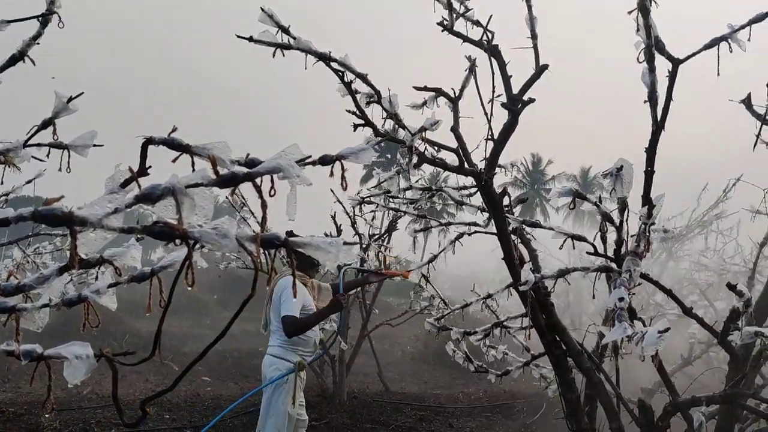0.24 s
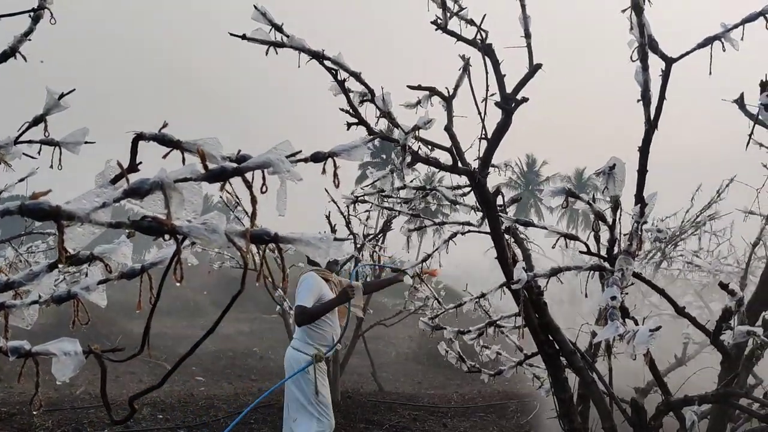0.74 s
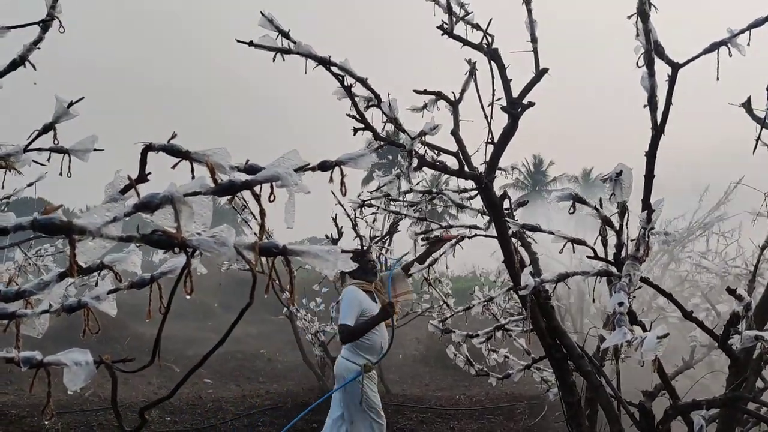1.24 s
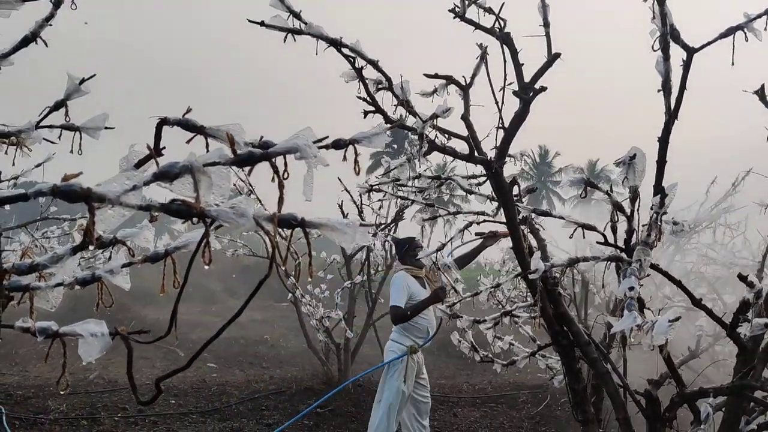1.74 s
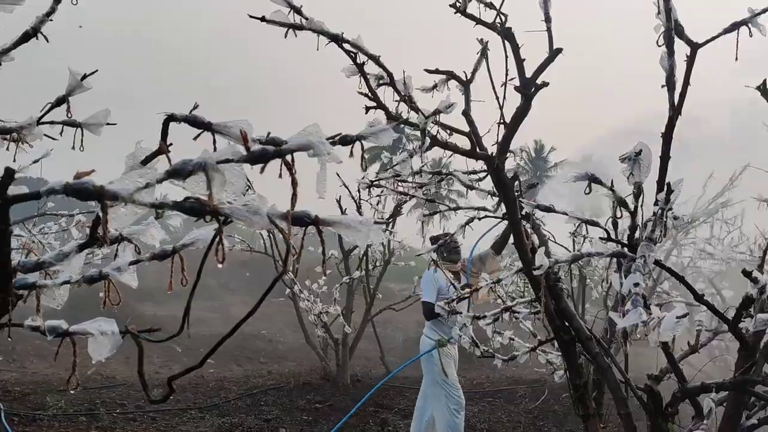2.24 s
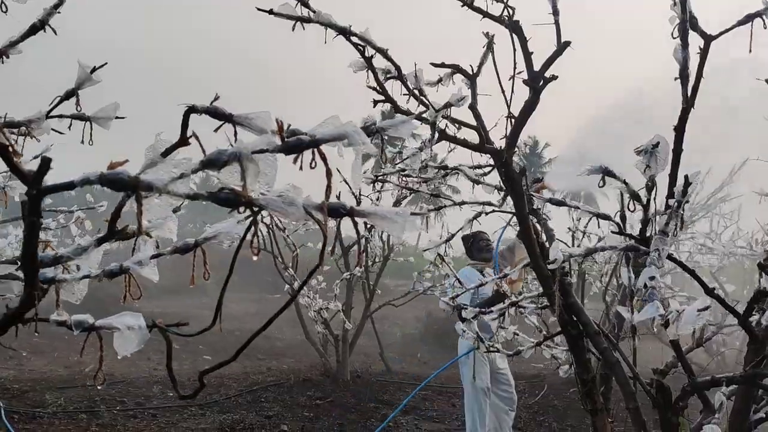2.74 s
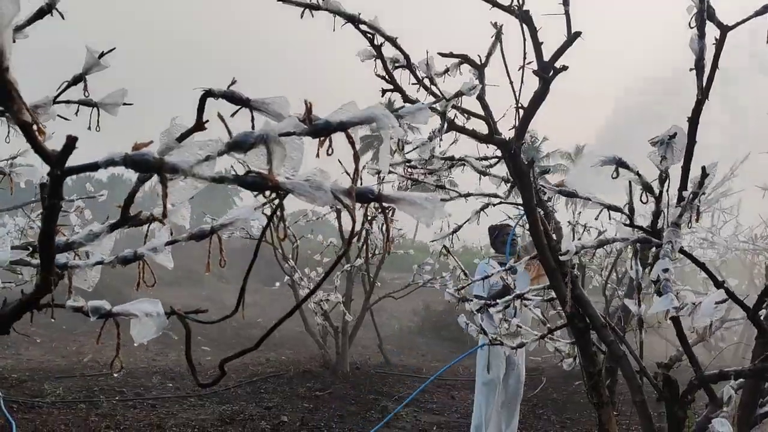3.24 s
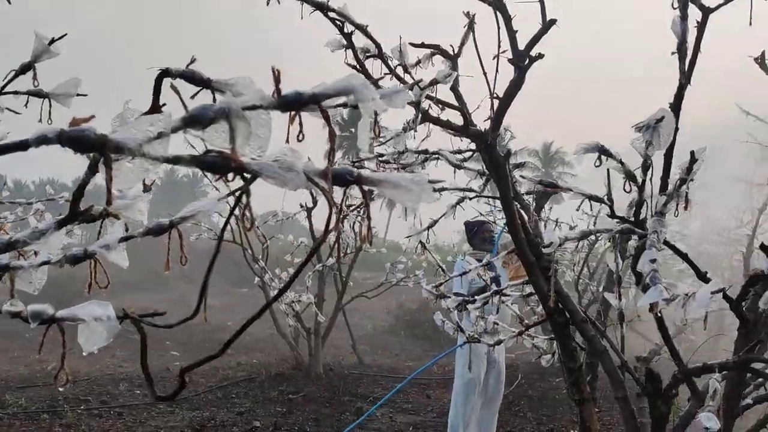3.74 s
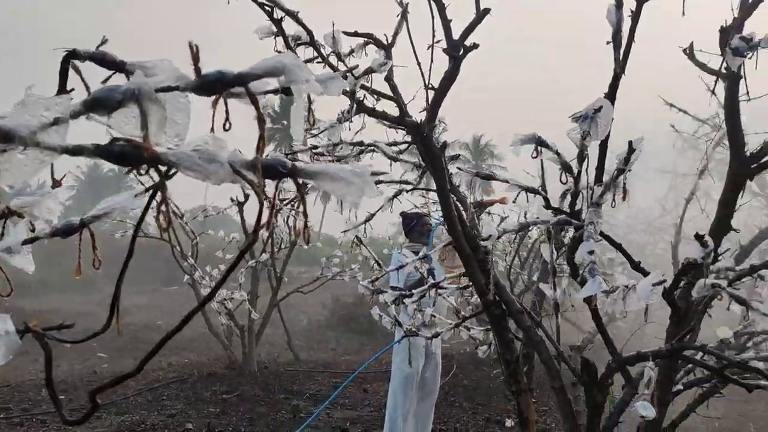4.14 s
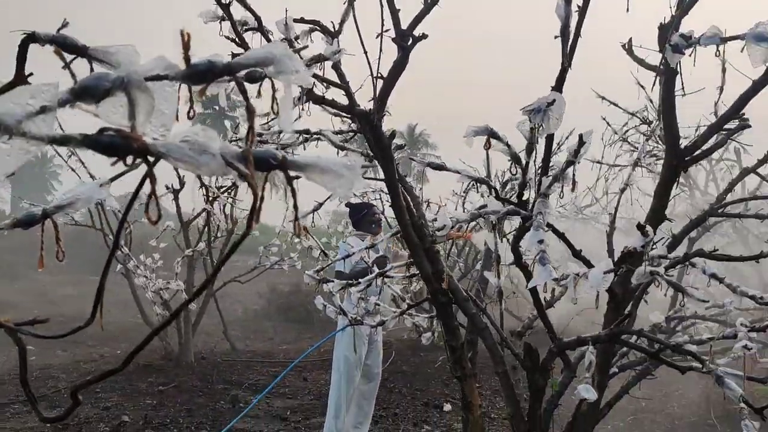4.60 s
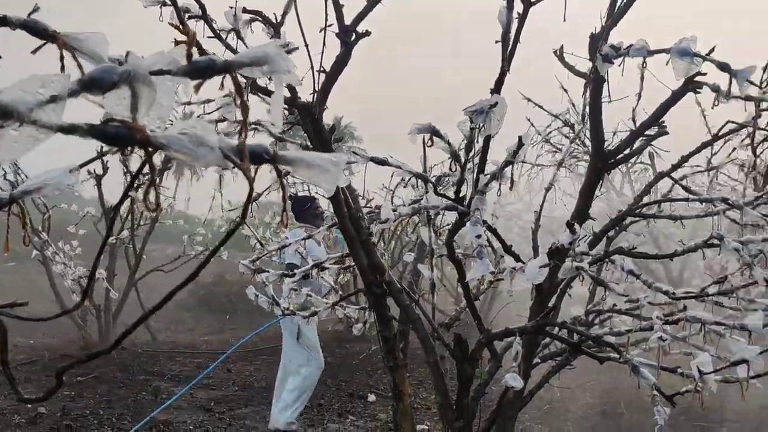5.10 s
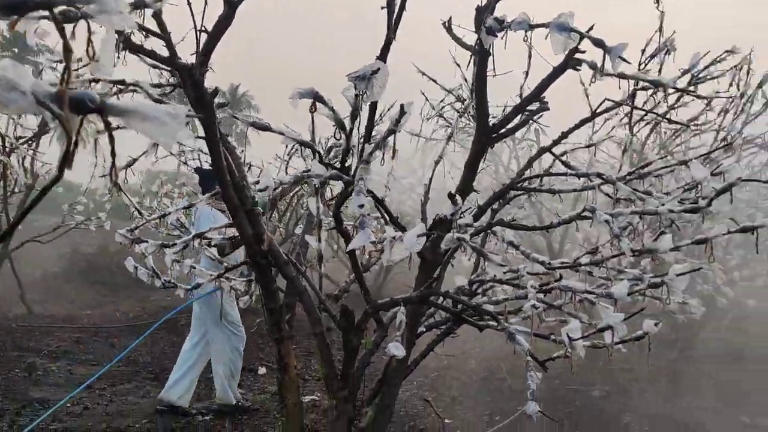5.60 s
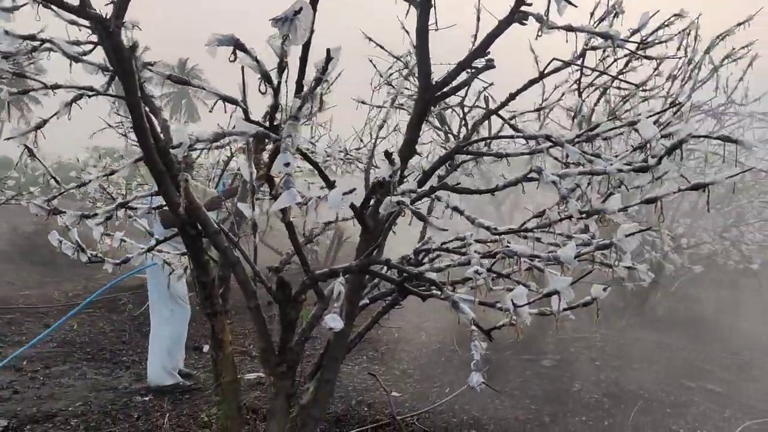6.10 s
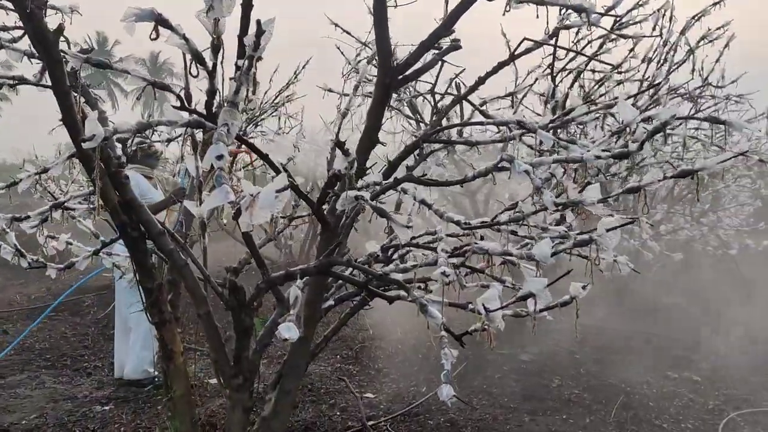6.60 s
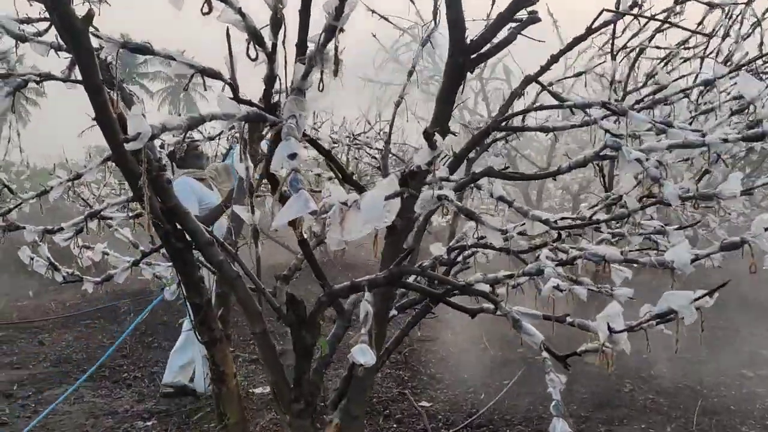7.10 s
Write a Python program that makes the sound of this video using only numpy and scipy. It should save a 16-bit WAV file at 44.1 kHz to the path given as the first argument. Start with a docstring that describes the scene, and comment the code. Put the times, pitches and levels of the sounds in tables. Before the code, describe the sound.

A hand-held spray gun hisses without a break among bare orchard trees, a few metres from the microphone. As it is swung about, the rush of water shifts in colour with a soft phasing swish, and brief half-whistling tones swell and fade inside it. Further off, a single-cylinder diesel engine thuds evenly, with a faint pump hum and low open-air rumble underneath.

```python
"""Orchard spray gun and diesel pump

A hand-held spray gun hisses over bare trees, swung about a few metres from a moving phone.
The turbulent jet reaches two microphone ports directly and off the holder's body, the ground and
the branches; the paths change, so its colour sweeps. Half-whistling bands surge with the swing.
Further off a single-cylinder diesel thuds steadily and drives a humming pump, over open-air rumble."""
import sys
import numpy as np
from scipy import signal
from scipy.fft import rfft, irfft, next_fast_len
from scipy.io import wavfile
from scipy.ndimage import uniform_filter1d, map_coordinates

SR = 44100
rng = np.random.default_rng(int(sys.argv[2]) if len(sys.argv) > 2 else 0)


def inscribe(sig):
    """Save sig as 16-bit PCM at rate SR to the path in sys.argv[1].

    A 1-D sig is mono; a 2-D sig holds one channel per row.
    Samples are clipped to [-1, 1] before scaling.
    """
    pcm = np.round(np.clip(np.atleast_2d(sig).T, -1, 1) * 32767)
    wavfile.write(sys.argv[1], SR, pcm.astype(np.int16))


N = 324135
TIME = np.arange(N) / SR

# jet spectra, dragged air up to finest mist: freq_hz, relative_density_db
ROAR_SPECTRUM = [(120.0, -57.0), (220.0, -27), (330.0, -3.5), (480.0, 0.2), (700.0, -5), (1000.0, -6),
                 (1350.0, -2.8), (1650.0, -2.5), (2100.0, -9), (3200.0, -19.1)]
RUSH_SPECTRUM = [(800.0, -31), (1200.0, -15.5), (1600.0, -9), (2000.0, -2.2), (2500.0, 1.8), (3000.0, 2.2),
                 (3500.0, -5), (4000.0, -4), (5000.0, -7.5), (7000.0, -28)]
HISS_SPECTRUM = [(2200.0, -7), (3200.0, 7), (4200.0, 4.5), (4700.0, 3.5), (5200.0, 10), (6100.0, 7.5),
                 (7000.0, -1.5), (8300.0, -19), (10000.0, -13.5), (12000.0, -31)]
MIST_SPECTRUM = [(5500.0, -2), (7000.0, 2.5), (8500.0, 5), (9500.0, -0.29), (11000.0, -0.3), (13000.0, 0.3),
                 (16000.0, -3.8)]
# roar of dragged air: time_s, level_db
ROAR_LEVELS = [(0.0, -45.4), (1.3, -44.5), (2.0, -46), (3.35, -47), (3.9, -45), (5.0, -46.5), (6.0, -45.5),
               (7.35, -45.5)]
# rush of the water fan: time_s, level_db
RUSH_LEVELS = [(0.0, -40.5), (0.45, -40.7), (1.08, -44.5), (1.52, -40.5), (2.1, -42), (2.7, -42.7),
               (3.57, -45.5), (4.0, -46), (4.57, -42), (5.06, -44.5), (5.73, -44), (6.1, -45.5),
               (6.45, -44), (7.35, -40.5)]
# how squarely the jet faces the phone, as beamed treble: time_s, treble_db
JET_FACING = [(0.0, -49.5), (0.6, -49.5), (0.97, -47), (1.31, -48), (1.55, -51), (2.02, -49.0),
              (2.45, -49.3), (2.9, -48), (3.4, -45.5), (3.84, -47.5), (4.32, -48), (4.79, -51), (5.12, -54),
              (5.71, -52.5), (6.4, -52), (6.77, -51), (6.9, -49), (7.35, -49.5)]
# paths set by the holder's stance: time_s, right_port_lag_ms, left_body_echo_ms, right_body_echo_ms
STANCE_DELAYS = [(0.0, 0.2, 1.1, 0.84), (0.5, 0.2, 1.11, 0.86), (1.2, 0.19, 1.13, 0.83),
                 (1.8, 0.13, 1.08, 0.84), (2.6, 0.13, 1.14, 0.85), (3.7, 0.13, 1.16, 0.87),
                 (4.3, 0.18, 1.31, 0.87), (5.1, 0.2, 1.24, 0.87), (5.65, 0.31, 1.39, 1.0),
                 (6.05, 0.29, 1.13, 0.81), (6.4, 0.29, 1.25, 0.87), (6.8, 0.29, 1.5, 1.15),
                 (7.35, 0.26, 1.59, 1.15)]
# ground echo as the gun is raised and dipped: time_s, delay_ms
GROUND_DELAYS = [(0, 2.1), (.52, 1.86), (1.26, 2.18), (1.91, 2.07), (2.62, 2.5), (3.44, 2.22), (4.1, 2.27),
                 (5.09, 2.02), (6.08, 1.87), (7.35, 2.34)]
# microphone port resonances: centre_hz, width_hz, gain_db
LEFT_RESONANCES = [(756, 250, 7), (2520, 610, 7.5), (4130, 700, 2), (6550, 400, 6), (7830.0, 1800, -6),
                   (13000.0, 6500.0, -1.5), (510, 290, -6)]
RIGHT_RESONANCES = [(996, 300, 4), (1896, 140, 4), (3760, 190, -2), (4500, 200, -0.5), (4800, 430, 3),
                    (5790.0, 320, 0.9), (6690.0, 410, 1.5), (7400, 280.0, 3.5)]
# resonances surging in the hiss: peak_s, length_s, centre_hz, width_hz, peak_db, pan_db, glide_hz_per_s
WHISTLE_SURGES = [(0, 0.22, 2520, 300, -42, -9, 0), (.44, 0.41, 2627, 280, -44, -2, -60.5),
                  (.5, .6, 3374, 507, -50.5, -5, -600), (.47, 0.61, 2218, 330, -42.5, -14, -95),
                  (.72, .22, 5750, 380, -45.5, -2, 0), (.56, 0.42, 6520, 280, -49.5, 8, -90),
                  (.92, 0.31, 5080, 340, -45.5, -6, 0), (1.2, .3, 4960, 220, -45, -12, -500),
                  (1.2, .36, 5800, 400, -45, -1, -200), (1.51, .99, 7580, 330, -51.5, -17, 0),
                  (1.722, 0.58, 2330, 330, -46.5, -12, 0), (1.799, .3, 5370, 280, -48.5, 0, 400),
                  (1.862, .56, 6280, 400, -49, 0, -500), (2.32, 0.42, 5185, 420, -41.5, -9, -300),
                  (2.656, .31, 5800, 320, -48, -15, -300), (2.72, .32, 5130, 560, -39, -10, -100),
                  (2.42, .38, 7660, 300, -50, -14, 0), (3, .55, 9450, 800, -54, -20, 90),
                  (3.2, 0.59, 5130, 520, -44, -12, 100), (3.337, .56, 7760, 500, -49.5, -12, 0),
                  (3.53, 0.79, 2558, 370, -42.5, -5.5, 150), (3.67, 0.4, 5020, 534, -40, -17, 100),
                  (3.88, 0.38, 5920, 420, -42, -16, -420), (3.8, 0.32, 8360, 350, -54.5, 1, -290),
                  (4.02, .36, 6880, 450, -45.5, -3, -1100), (4.091, .37, 4970, 280, -45.5, -11, 0),
                  (4.33, .25, 5680, 320, -50, -10, -400), (4.581, 0.23, 5050, 320, -44, -24, 0),
                  (4.724, .27, 8380, 400, -53.5, -13, 0), (5.5, .34, 6600, 340, -53, -5, -1100),
                  (5.639, 0.78, 4760, 449, -53, 12, -450), (5.689, .33, 4300, 320, -51, -19, 580),
                  (5.75, 0.23, 3240, 220, -52, -14, 600), (6.072, .5, 4960, 320, -50.5, 2, -210),
                  (6.24, .24, 5940, 340, -49.5, -2, -730), (6.698, 0.82, 5040, 430, -49.5, -9, -500),
                  (6.74, 1, 1847, 380, -48, -23, -310), (6.85, 0.19, 2653, 310, -41.5, -9, -500),
                  (7.22, .3, 2567, 352, -42, -8, -150), (1.1, .45, 13500, 3800, -54, 2, 0),
                  (6.98, .35, 13000, 3800, -55, -4, 0)]
# echoes off the nearest trunks and branches: delay_ms, gain_db
TREE_ECHOES = [(1.5, -19), (3.1, -17), (4.4, -18), (6.2, -19)]
# puffs of one engine cycle: delay_ms, pitch_hz, swell_ms, peak_db, spread_db
ENGINE_PUFFS = [(0, 90.3, 5.9, -38, 0.35), (22, 53, 4, -51.5, -1), (34.4, 56, 5, -50, 5)]
# hum of the pump and its frame: pitch_hz, rms_db
PUMP_TONES = [(26.2, -66), (29.3, -61.5), (40.4, -59.5)]
# open-air rumble: freq_hz, relative_density_db
RUMBLE_SPECTRUM = [(5, 8), (18, -6.5), (27, 15), (36, -31), (55, 3.5), (80, -11.5), (130, -7), (200, -9),
                   (300, -8.5), (600, -24)]


def spray():
    """The jet at two ports, coloured by echoes and port resonances, with whistling on top."""
    lag_ms, left_ms, right_ms = curves(STANCE_DELAYS)
    (left, right), scattered = jet(lag_ms)
    left = close_echoes(left, left_ms, body_db=-10.5, body_cutoff_hz=5500, ground_db=-14)
    right = close_echoes(right, right_ms, body_db=-4, body_cutoff_hz=1550, ground_db=-13.5)
    left = resonant(left + scattered[0], LEFT_RESONANCES)
    right = resonant(delayed(right, lag_ms) + scattered[1], RIGHT_RESONANCES)
    return branch_echoes(np.array([left, right]) + whistling())


def jet(lag_ms, lift_s=3.7, lower_s=5.4, swing_s=0.34, mean_facing_db=-50):
    """Turbulence in four bands; the finer hiss and mist are beamed, so they follow the aim."""
    aim_db = curves(JET_FACING)[0] - mean_facing_db
    roar_db, = curves(ROAR_LEVELS)
    rush_db, = curves(RUSH_LEVELS)
    lifted = smooth_step(lift_s, swing_s) - smooth_step(lower_s, swing_s)
    hiss_pan_db = np.interp(lifted, [0, 1], [3.5, 0])  # left to centre as the gun lifts into the tree
    roar = jet_band(ROAR_SPECTRUM, roar_db, pan_db=-2.5, scatter_db=-9, flutter_db=0.67)
    rush = jet_band(RUSH_SPECTRUM, rush_db, pan_db=-9 - 13 * lag_ms, scatter_db=-8, flutter_db=1.08)
    hiss = jet_band(HISS_SPECTRUM, -44 + 0.78 * aim_db, hiss_pan_db, scatter_db=-4.5, flutter_db=0.85)
    mist = jet_band(MIST_SPECTRUM, -43.5 + aim_db, pan_db=0.2, scatter_db=2, flutter_db=0.68)
    return roar + rush + hiss + mist


def jet_band(spectrum, level_db, pan_db, scatter_db, flutter_db):
    """Fluttering noise as [direct, scattered]; what the trees scatter is unrelated at each port."""
    level = undb(level_db + flutter_db * walk(21.97))
    gain = level * panned(pan_db) / np.sqrt(1 + undb(2 * scatter_db))
    scattered = np.array([noise(spectrum) for _ in range(2)])
    return np.array([gain * noise(spectrum), gain * undb(scatter_db) * scattered])


def close_echoes(direct, body_ms, body_db, body_cutoff_hz, ground_db):
    """Body and ground echoes comb the sound; the combs slide as gun and phone move."""
    # the body echo brightens as the phone moves round the tree
    clear_share = np.interp(smooth_step(centre_s=4.8, length_s=0.8), [0, 1], [0.52, 0.7])
    bounced = (1 - clear_share) * dull(direct, body_cutoff_hz) + clear_share * dull(direct, 12000)
    bounced = shaped(bounced, lambda f: -10 * np.log10(1 + (400 / f) ** 4))  # bass bends round the body
    body = undb(body_db) * delayed(bounced, body_ms)
    ground_ms, = curves(GROUND_DELAYS)
    ground = undb(ground_db) * dull(delayed(direct, ground_ms), cutoff_hz=9000)
    return direct + body + ground


def whistling(waver_depth=0.008, waver_per_s=9, span_samples=70000):
    """Each surge swells, glides with the swing of the gun, wavers with the hand and fades."""
    out = np.zeros((2, N))
    waver = 1 + waver_depth * walk(waver_per_s)
    for peak_s, length_s, centre_hz, width_hz, peak_db, pan_db, glide_hz_per_s in WHISTLE_SURGES:
        start = int(np.clip(peak_s * SR - span_samples / 2, 0, N - span_samples))
        span = slice(start, start + span_samples)
        from_peak_s = TIME[span] - peak_s
        fade_db = 3 * (2 * from_peak_s / length_s) ** 2
        pitch_hz = (centre_hz + glide_hz_per_s * from_peak_s) * waver[span]
        shared = narrow_noise(pitch_hz, width_hz)
        ports = np.array([shared + narrow_noise(pitch_hz, width_hz) / 2 for _ in range(2)])
        out[:, span] += ports / ports.std() * panned(pan_db) * undb(peak_db - fade_db)
    return out


def branch_echoes(ports, sway_ms=0.14, sway_per_s=1.8):
    """Echo paths wander as the gun swings: a phasing swish, overall rms unchanged."""
    out = ports
    for delay_ms, gain_db in TREE_ECHOES:
        path_ms = delay_ms + sway_ms * walk(sway_per_s)
        emitted_s = TIME - path_ms / 1000
        out = out + undb(gain_db) * np.array([np.interp(emitted_s, TIME, port) for port in ports])
    return out * ports.std() / out.std()


def diesel(firing_hz=12.8304, first_firing_s=0.00916, wander_s=0.00044, pitch_spread=0.008):
    """One sharp exhaust puff per firing; softer puffs follow as the cylinder empties and refills."""
    cycles = (TIME - first_firing_s + wander_s * walk(0.72)) * firing_hz
    out = 0
    for delay_ms, pitch_hz, swell_ms, peak_db, spread_db in ENGINE_PUFFS:
        puff_cycles = cycles - delay_ms / 1000 * firing_hz + 1
        age_s = puff_cycles % 1 / firing_hz
        firing = np.floor(puff_cycles).astype(int)
        peak = undb(peak_db + spread_db * rng.standard_normal(128))[firing]
        puff_hz = pitch_hz * (1 + pitch_spread * rng.standard_normal(128))[firing]
        swell = age_s * 1000 / swell_ms
        envelope = peak * swell ** 2 * np.exp(2 * (1 - swell))
        out = out + envelope * np.sin(2 * np.pi * puff_hz * age_s)
    return out * panned(-2.5)


def pump():
    """Low tones of the shaking pump, wavering slightly in level and phase."""
    hum = 0
    for pitch_hz, rms_db in PUMP_TONES:
        amplitude = np.sqrt(2) * undb(rms_db + walk(3))
        hum = hum + amplitude * np.sin(2 * np.pi * pitch_hz * TIME + walk(1.5) / 2)
    return hum * panned(-10)


def open_air(level_db=-51, side_db=-13):
    """Low rumble, nearly alike at both ports."""
    side = undb(side_db) * noise(RUMBLE_SPECTRUM) * np.array([[1], [-1]])
    return undb(level_db) * (noise(RUMBLE_SPECTRUM) + side) * panned(-2.6)


def noise(spectrum):
    """Coloured noise, rms 1."""
    freq_hz, density_db = np.transpose(spectrum)
    white = rng.standard_normal(N)
    x = shaped(white, lambda f: np.interp(np.log(f), np.log(freq_hz), density_db, left=-90, right=-90))
    return x / x.std()


def narrow_noise(centre_hz, width_hz):
    """Noise-driven resonance with a moving centre, rms 1."""
    pole = np.exp(-np.pi * width_hz / SR)
    drive = rng.standard_normal(len(centre_hz)) + 1j * rng.standard_normal(len(centre_hz))
    baseband = signal.lfilter([1], np.poly([pole, pole]), drive)
    x = np.real(baseband * np.exp(2j * np.pi * np.cumsum(centre_hz) / SR))
    return x / x.std()


def shaped(x, gain_db):
    """Filter by a function from Hz to dB."""
    size = next_fast_len(N)
    freq_hz = np.maximum(np.arange(size // 2 + 1) * SR / size, 1)
    return irfft(rfft(x, size) * undb(gain_db(freq_hz)), size)[:N]


def resonant(x, bells):
    """Bell-shaped boosts and dips."""
    return shaped(x, lambda f: sum(db / (1 + (2 * (f - hz) / width_hz) ** 2)
                                   for hz, width_hz, db in bells))


def dull(x, cutoff_hz):
    """Treble loss at a soft surface."""
    return shaped(x, lambda f: -10 * np.log10(1 + (f / cutoff_hz) ** 2))


def delayed(x, delay_ms):
    """Path of changing length."""
    return map_coordinates(x, [np.arange(N) - delay_ms * SR / 1000], order=3, mode="mirror")


def walk(steps_per_s):
    """Random steps smoothed twice, standard deviation 1."""
    hold = int(SR / steps_per_s)
    steps = np.repeat(rng.standard_normal(N // hold + 1), hold)
    x = uniform_filter1d(uniform_filter1d(steps, hold), hold)[:N]
    return x / x.std()


def curves(table):
    """Each column after time_s, interpolated linearly."""
    time_s, *columns = np.transpose(table)
    return [np.interp(TIME, time_s, column) for column in columns]


def smooth_step(centre_s, length_s):
    """Smooth rise from 0 to 1."""
    return 0.5 + 0.5 * np.tanh(2 * (TIME - centre_s) / length_s)


def panned(pan_db):
    """Stereo gains of unit mean power; pan_db is left minus right."""
    gains = undb(np.array([pan_db, -pan_db]) / 2).reshape(2, -1)
    return gains / np.sqrt(np.mean(gains ** 2, axis=0))


def undb(db):
    """Decibels to gain."""
    return 10 ** (np.asarray(db) / 20)


def scene():
    """Spray in front, engine and pump behind."""
    return spray() + diesel() + pump() + open_air()


def record(dry):
    """The phone cuts the top treble."""
    cutoff_hz = 15750
    return signal.sosfilt(signal.ellip(12, 0.1, 70, cutoff_hz, fs=SR, output="sos"), dry)


dry = scene()
out = record(dry)
inscribe(out)
```